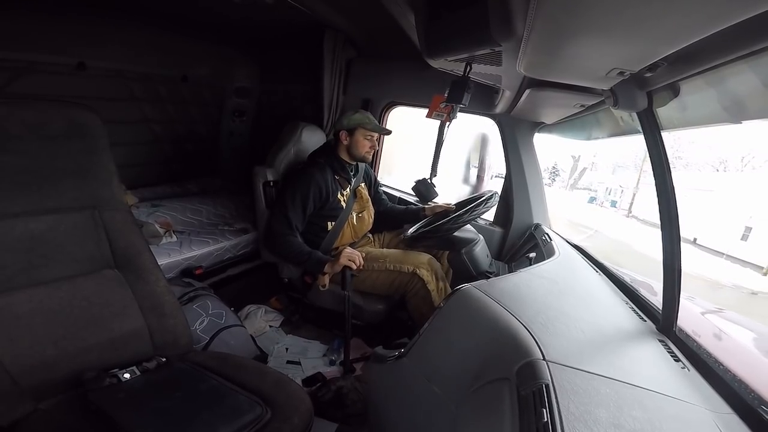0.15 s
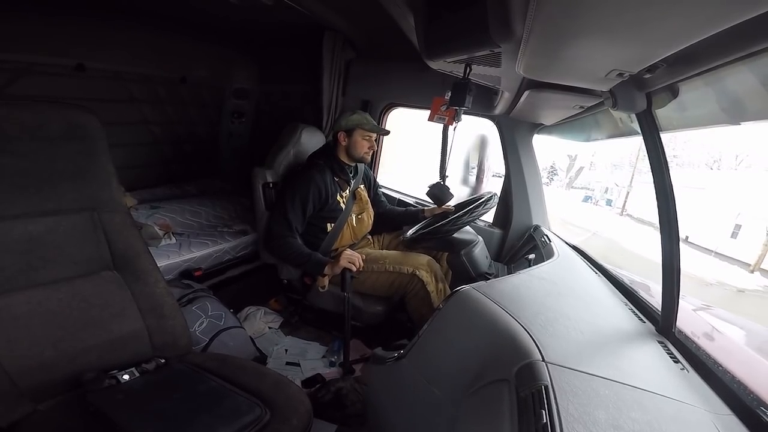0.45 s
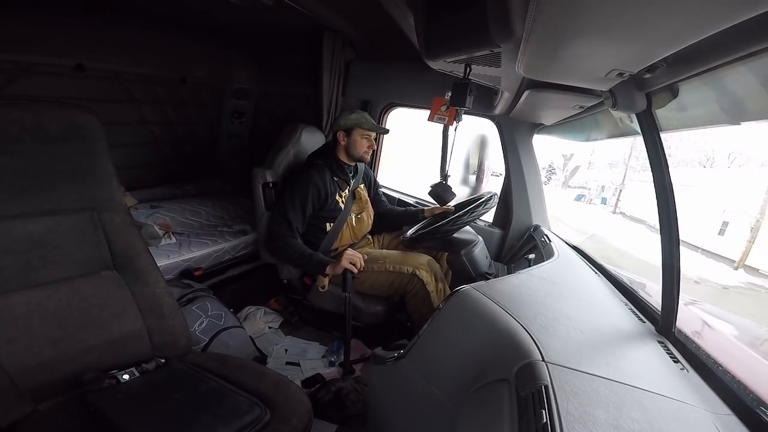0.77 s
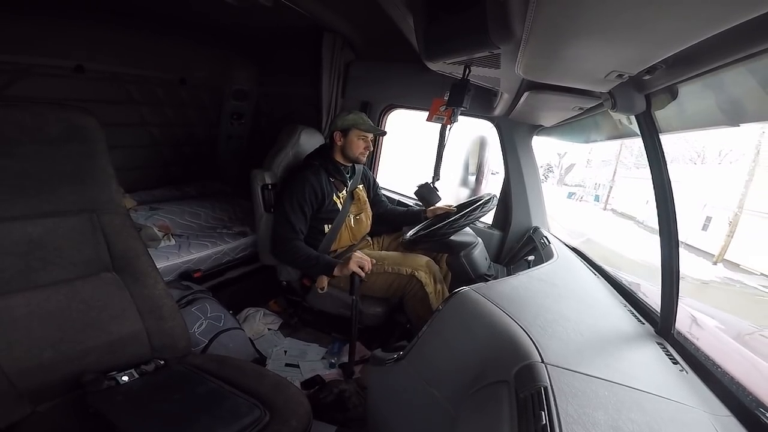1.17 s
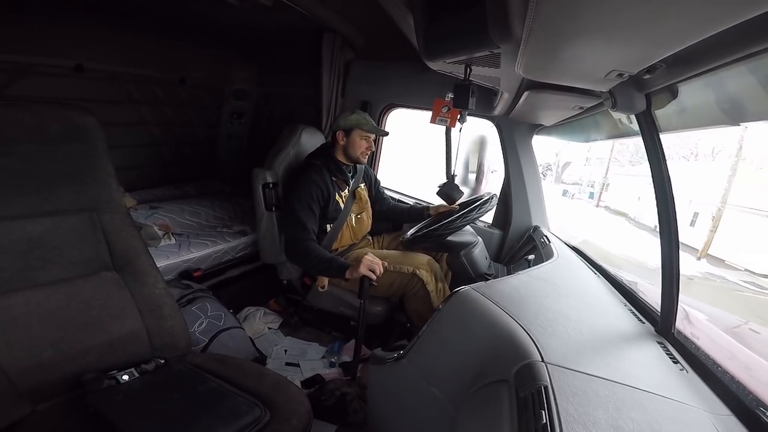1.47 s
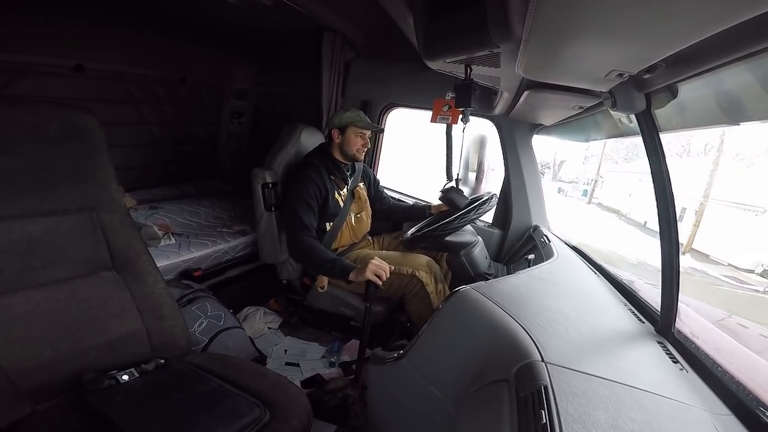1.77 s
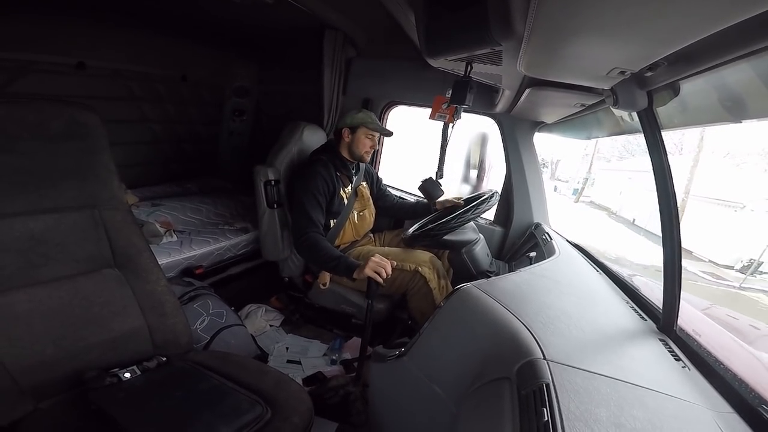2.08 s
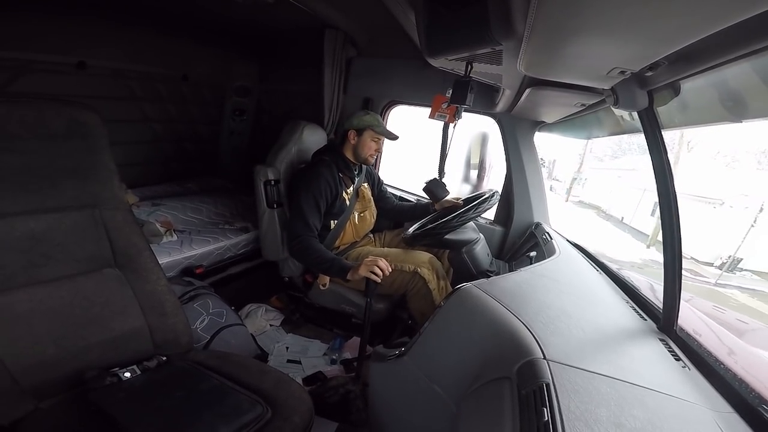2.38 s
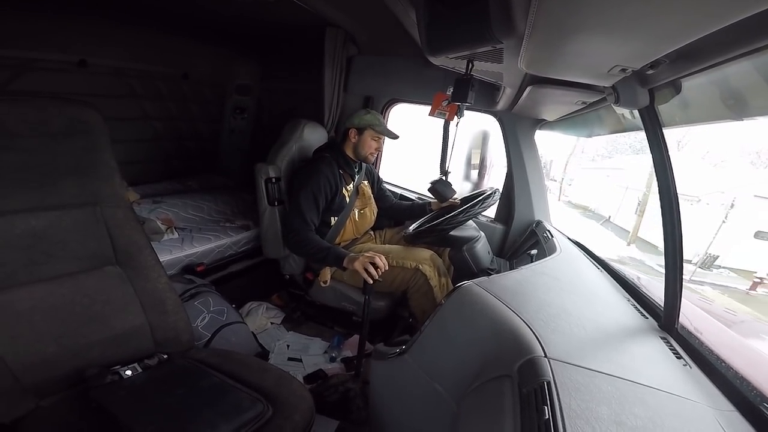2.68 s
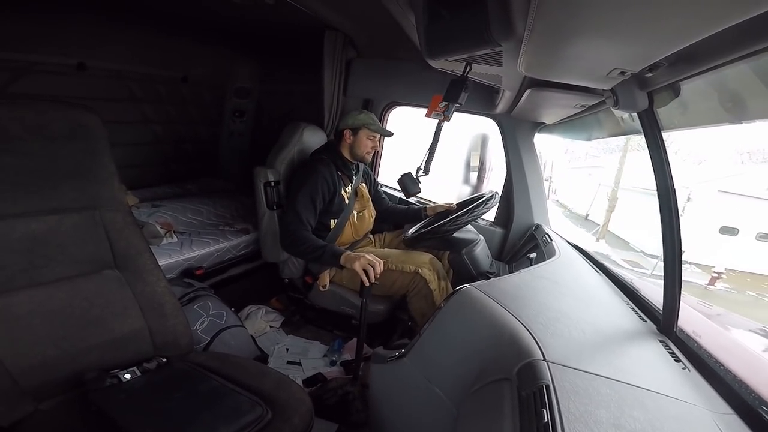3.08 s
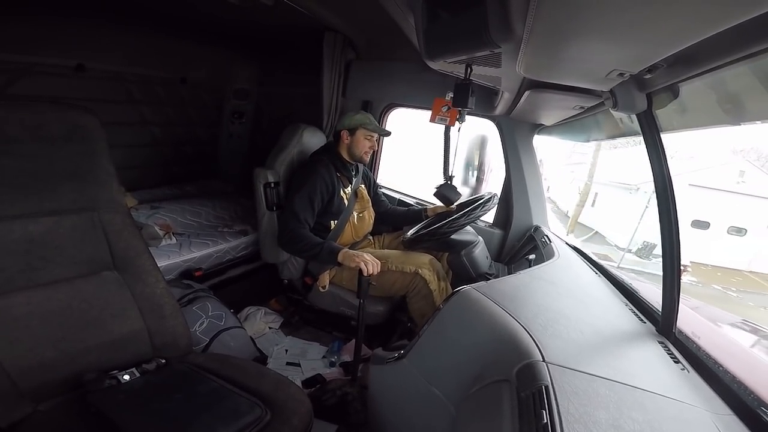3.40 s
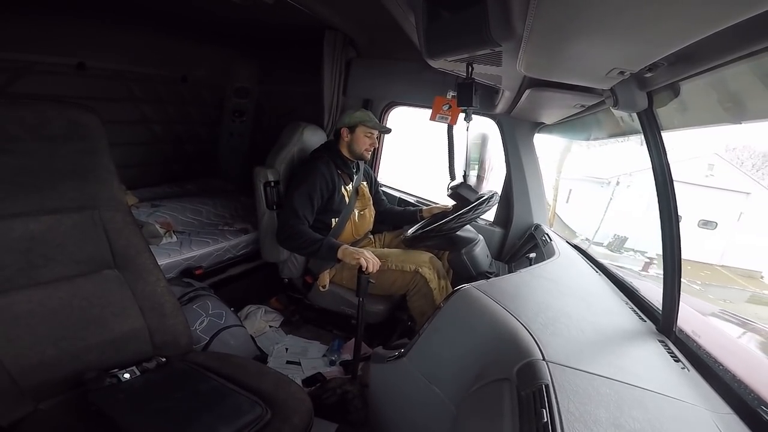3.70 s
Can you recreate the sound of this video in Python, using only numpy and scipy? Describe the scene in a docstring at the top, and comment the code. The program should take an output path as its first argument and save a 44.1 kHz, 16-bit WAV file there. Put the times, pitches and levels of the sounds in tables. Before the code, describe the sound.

Deep six-cylinder diesel engine growls in a truck cab, its revs rising and falling repeatedly.

```python
"""A six-cylinder diesel heard in a truck cab, revving up and easing off in turn, about 1200 to 1900 rpm.
Crank-locked sines boom; pulsed, filtered noise roars, clatters and hisses; gears whine in step with the crank.
A turbo whistles faintly. Trim squeaks as short rasping notes and buzzes in a narrow noise band.
Filtered noise rumbles as the road. Side noise fades, narrowing the stereo to mono in the first 1.5 s."""
import sys
import numpy as np
from scipy import signal
from scipy.fft import rfft, irfft
from scipy.io import wavfile
from scipy.ndimage import uniform_filter1d, minimum_filter1d

SR = 44100
rng = np.random.default_rng(int(sys.argv[2]) if len(sys.argv) > 2 else 0)


def wrap_up_sound(samples):
    """Save the sound to the file named by the first command line argument, as 16-bit audio."""
    columns = np.atleast_2d(samples).T
    # keep every value between -1 and 1, then stretch to whole-number steps
    tamed = np.clip(columns, -1, 1)
    steps = np.round(tamed * 32767).astype(np.int16)
    wavfile.write(sys.argv[1], SR, steps)


N = 169785
T = np.arange(N) / SR

# engine speed before wander: t/s, speed/rpm
SPEED_RPM = [(0.0, 1186), (0.2, 1265), (0.4, 1388), (0.75, 1670), (0.87, 1699), (1.1, 1533), (1.5, 1323),
             (1.7, 1222), (1.85, 1178), (2.15, 1323), (2.45, 1590), (2.6, 1655), (2.75, 1605), (2.92, 1525),
             (3.05, 1569), (3.4, 1807), (3.6, 1916), (3.85, 1749)]
SPEED_WANDER, SPEED_WANDER_HZ = 0.002, 8.25  # rms share, rate
# main engine orders, relative: t/s, crank shake/dB, firing note/dB, lope just above it/dB, its fifth/dB, its octave/dB
MAIN_ORDERS = [(0.0, -36, -28, -35, -17, -36), (0.3, -38, -14, -35, -24, -14),
               (0.5, -26, -28, -30, -16, -16), (0.75, -21, -29, -20, -23, -28),
               (0.9, -38, -36, -25, -21, -26), (1.2, -26, -17, -20, -23, -23),
               (1.5, -21, -31, -33, -14, -28), (1.7, -26, -34, -36, -26, -26),
               (1.95, -38, -26, -30, -23, -24), (2.2, -32, -17, -30, -18, -15),
               (2.5, -19, -24, -20, -24, -16), (2.85, -32, -27, -16, -20, -14),
               (3.15, -23, -38, -23, -29, -20), (3.35, -35, -19, -24, -16, -30),
               (3.55, -28, -13, -21, -27, -35), (3.85, -24, -19, -27, -18, -42)]
# those orders: multiples of crank speed
MAIN_MULTIPLES = (1, 3, 3.5, 4.5, 6)
MAIN_DB, TWELFTH_DB = 2, -10.5  # gain of all main orders; twelfth above the firing note re its octave
# other orders, from unequal cylinders, relative: multiple of crank speed, level/dB
ORDER_LEVELS = [(2, -24), (2.5, -27), (4, -28.5), (5, -31), (5.5, -32), (7, -33), (7.5, -30), (10, -36),
                (10.5, -34.5), (12, -41), (15, -38)]
# cab response to those orders: f/Hz, gain/dB
CAB = [(41, -23), (50, -5), (63, 0), (160, 3.5), (185, -5.5), (230, -2.5), (265, -9.5), (400, -14)]
UPPER_FOLLOW, LOWER_FOLLOW = 0.93, 0.52  # order level against load, dB per dB
MAIN_FLUTTER, FLUTTER, FLUTTER_HZ = 0.12, 0.7, 6.45  # rms shares, rate
# engine load as relative roar level: t/s, level/dB
LOAD = [(0, -25.5), (.1, -28), (.27, -26.5), (.45, -33.5), (.6, -37.5), (1.1, -40), (1.7, -39.5),
        (1.92, -31), (2.15, -29.5), (2.5, -31), (2.95, -34), (3.15, -35.5), (3.45, -32.5), (3.85, -37.5)]
# exhaust roar spectrum, relative: f/Hz, level/dB per Hz
ROAR = [(120, -30.5), (240, 5.5), (330, 2), (510, -3), (600, -5), (750, -2.5), (1000, -9.5), (1300, -12.5),
        (1550, -14), (1900, -14.5), (2400, -29), (3000, -30.5), (6000, -69)]
# valve clatter spectrum, relative: f/Hz, level/dB per Hz
CLATTER = [(700, -24.5), (1500, -2), (2300, 7.5), (2800, -2.5), (3500, -1.5), (3900, 1.5), (4300, -3),
           (5400, -10), (7000, -38.5)]
# air hiss spectrum, relative: f/Hz, level/dB per Hz
HISS = [(3500, -21.5), (5300, -1.5), (6600, 0.5), (7200, -10.5), (9000, -11), (11500, -20), (12700, -19),
        (15000, -40.5)]
ROAR_DB, CLATTER_DB, HISS_DB = 2.5, 2.5, -7
# common level of clatter and hiss, relative: t/s, level/dB
TREBLE_LEVEL = [(0, -50), (.28, -51), (.5, -58), (.8, -54), (1.65, -53.5), (1.9, -51.5), (2.15, -47),
                (2.9, -49.5), (3.1, -52), (3.5, -49), (3.85, -51)]
PULSE_DEPTH, CLATTER_DEPTH = 0.31, 0.21  # pulsed share of the noise amplitude
PULSE_DECAY_FIRINGS, UNEVEN_DB = 0.45, 1.5
REPEAT_SHARE = 0.42  # share of roar drive power repeating every two turns
# cab panels rung by the roar, relative: f/Hz, half-width at -6 dB/Hz, level/dB
PANELS = [(311, 49, -9.5), (600, 20, -14), (658.4, 26, -14.5), (751, 26, -22.5), (900, 68, -20.5),
          (989, 66, -20.5)]
# extra engine-noise colour while the stereo is wide: f/Hz, gain/dB
WIDE_COLOUR = [(305, 2.5), (370, -5), (450, -3.5), (660, -7), (760, 5.5), (900, 2), (1100, -2.5), (1280, 4),
               (1520, 1.5), (1700, 9), (1870, -5), (2100, -1.5), (3900, 5.5), (4600, 1.5), (6400, 8.5),
               (7300, 14.5), (9700, 4.5)]
WIDE_UNTIL_S, PLAIN_FROM_S = 0.3, 0.73
# gear meshes, lower and upper: teeth passing per crank turn
TEETH = (83, 105)
# lower gear whine: t/s, level/dB
LOWER_WHINE = [(0, -38), (.2, -37), (.33, -35), (.42, -49), (.65, -62), (.78, -49), (.86, -52), (.94, -46),
               (1.02, -62), (1.11, -49), (1.16, -56), (1.21, -45.5), (1.255, -45), (1.272, -57),
               (1.29, -43.5), (1.4, -63), (1.43, -48), (1.47, -46), (1.52, -58), (2.24, -54), (2.275, -35),
               (2.31, -56), (3.1, -57), (3.25, -51), (3.6, -59), (3.85, -52)]
# upper gear whine: t/s, level/dB
UPPER_WHINE = [(.65, -72), (.7, -57), (.93, -58), (.955, -66), (.98, -52), (1.09, -72), (3, -66),
               (3.4, -58), (3.85, -68)]
# turbo whistle, falling in pitch: t/s, f/Hz, level/dB
TURBO = [(.7, 6700, -88), (1.08, 6020, -70), (1.35, 5620, -76), (1.6, 5400, -70), (2.1, 5150, -84)]
WHINE_WIDTH_HZ, WHINE_STEADY = 32, 1.9  # blur; steady part re blurred part
# trim squeaks: start/s, length/s, f/Hz, note/dB, overtones/dB
SQUEAKS = [(0.486, 0.014, 2550, -54, -64), (1.306, 0.03, 2340, -42.5, -49), (1.342, .024, 2330, -45, -58),
           (2.318, 0.02, 2330, -51, -50), (3.488, .06, 2340, -47.5, -55)]
SQUEAK_BLUR_HZ, SQUEAK_THIRD_DB = 230, -10  # third harmonic re second
# buzzing trim: t/s, level/dB
SIZZLE_LEVEL = [(2.2, -80), (2.45, -58), (2.63, -58), (2.67, -51.5), (2.71, -58), (2.9, -57), (2.96, -51.5),
                (3.05, -75)]
SIZZLE_HZ, SIZZLE_WIDTH_HZ, SIZZLE_SHAKE = 3990, 220, 0.3
# road rumble spectrum, relative: f/Hz, level/dB per Hz
RUMBLE = [(12, -21), (27, -10.5), (42, -13), (62, -1), (90, -3.5), (140, -2.5), (180, -5.5), (250, -15),
          (310, -21.5), (380, -22.5), (480, -37.5), (1000, -79.5)]
# road rumble: t/s, level/dB
RUMBLE_LEVEL = [(0, -13.5), (.5, -25.5), (.9, -21), (1.12, -19), (1.4, -19), (1.75, -17), (2.1, -22),
                (2.7, -18), (3.1, -24), (3.85, -18)]
# diffuse side spectrum, relative: f/Hz, level/dB per Hz
SIDE_SHAPE = [(40, -10), (64, -3.5), (138, 1), (189, -9), (264, -18), (304, -2.5), (479, -23.5), (890, -4),
              (1080, -17.5), (1270, -13.5), (1540, -22), (1820, -23.5), (2610, -44.5), (4730, -49.5),
              (6770, -39.5), (9680, -62.5), (15000, -95)]
# stereo width as relative side level: t/s, level/dB
WIDTH = [(0, 2.5), (.35, 5.5), (.6, 1.5), (.9, -7.5), (1.25, -21.5), (1.5, -69)]
SIDE_DB = -19.5
EDGE_HZ = 15100  # band limit


def amp(db):
    """Decibels to gain."""
    return 10 ** (np.asarray(db) / 20)


def unit(x):
    """Scales to rms 1."""
    return x / np.sqrt(np.mean(abs(x) ** 2) + 1e-20)


def curve(table, axis=1):
    """One column of a time table at every sample."""
    columns = np.transpose(table)
    return np.interp(T, columns[0], columns[axis])


def read(points, hz):
    """A spectrum table on a log-frequency axis."""
    f, db = np.transpose(points)
    return np.interp(np.log(hz + 1), np.log(f + 1), db)


def colour(x, points):
    """Filters by a spectrum table, 12 dB/octave skirts beyond its ends; rms 1."""
    hz = np.fft.rfftfreq(N, 1 / SR)
    low_skirt = np.minimum(hz / points[0][0], 1) ** 2
    high_skirt = 1 / np.maximum(hz / points[-1][0], 1) ** 2
    return unit(irfft(rfft(x) * amp(read(points, hz)) * low_skirt * high_skirt, N))


def drift(hz):
    """Complex noise with a Gaussian spectrum about zero frequency; rms 1."""
    f = np.fft.fftfreq(N, 1 / SR)
    lowpass = np.exp(-(f / hz) ** 2)
    # independent weights break the +f/-f symmetry: the result is complex
    lopsided = 1 + np.sign(f) * np.exp(2j * np.pi * rng.random(N))
    return unit(np.fft.ifft(np.fft.fft(rng.standard_normal(N)) * lowpass * lopsided))


def order_wave(order, turns, flutter):
    """Sine locked to the crank, fluttering in level and phase."""
    tone = np.exp(2j * np.pi * (order * turns + rng.random()))
    return (tone * (1 + flutter * drift(FLUTTER_HZ))).real


def boom(crank_hz, turns):
    """Low engine orders fill the cab; of the unequal-cylinder orders, the upper follow load most."""
    out = np.zeros(N)
    main = [(order, curve(MAIN_ORDERS, axis=column + 1)) for column, order in enumerate(MAIN_MULTIPLES)]
    main.append((9, main[-1][1] + TWELFTH_DB))  # twelfth swells with the octave
    for order, db in main:
        out += amp(MAIN_DB + db) * order_wave(order, turns, MAIN_FLUTTER)
    load_db = curve(LOAD) - curve(LOAD).mean()
    for order, db in ORDER_LEVELS:
        follow = UPPER_FOLLOW if order > MAIN_MULTIPLES[-1] else LOWER_FOLLOW
        level_db = db + read(CAB, order * crank_hz) + follow * load_db
        out += amp(level_db) * order_wave(order, turns, FLUTTER)
    return np.sqrt(2) * out


def engine_noise(turns):
    """Exhaust roar, valve clatter and air hiss pulse with firing; part of the roar repeats every two turns."""
    pattern = rng.standard_normal(size=1024)
    repeating = np.interp(turns / 2 % 1, np.linspace(0, 1, len(pattern)), pattern)
    repeating = np.sqrt(REPEAT_SHARE) * colour(repeating, ROAR)
    pulsing = np.sqrt(1 - REPEAT_SHARE) * colour(puffs(turns, PULSE_DEPTH), ROAR)
    drive = repeating + pulsing
    roar = amp(curve(LOAD)) * (amp(ROAR_DB) * drive + panels(drive))
    clatter = amp(CLATTER_DB) * colour(puffs(turns, CLATTER_DEPTH), CLATTER)
    hiss = amp(HISS_DB) * colour(puffs(turns, CLATTER_DEPTH), HISS)
    return roar + amp(curve(TREBLE_LEVEL)) * (clatter + hiss)


def puffs(turns, depth):
    """Noise surging at three firings per turn, uneven by cylinder and by firing."""
    firing = 3 * turns
    index = firing.astype(int)
    by_cylinder = rng.standard_normal(size=6)[index % 6]
    by_firing = rng.standard_normal(size=1000)[index]
    size = amp(UNEVEN_DB * (by_cylinder + by_firing) / np.sqrt(2))
    pulse = unit(size * np.exp(-(firing % 1) / PULSE_DECAY_FIRINGS))
    return rng.standard_normal(N) * (1 - depth + depth * pulse)


def panels(drive):
    """Cab panels ring as narrow resonances driven by the roar."""
    hz, spectrum = np.fft.rfftfreq(N, 1 / SR), rfft(drive)
    out = np.zeros(N)
    for f, half_width_hz, db in PANELS:
        resonance = 1 / (1 + 1j * (hz - f) / half_width_hz) ** 2
        out += amp(db) * unit(irfft(spectrum * resonance, N))
    return out


def wide_colour(x):
    """Extra filter colour, crossfaded out as the stereo narrows."""
    coloured = irfft(rfft(x) * amp(read(WIDE_COLOUR, np.fft.rfftfreq(N, 1 / SR))), N)
    return x + np.interp(T, [WIDE_UNTIL_S, PLAIN_FROM_S], [1, 0]) * (coloured - x)


def whines(turns):
    """Two gear meshes sing at tooth rate; the turbo whistles on its own falling pitch."""
    turbo_cycles = np.cumsum(curve(TURBO)) / SR
    lines = [(TEETH[0] * turns, curve(LOWER_WHINE)), (TEETH[1] * turns, curve(UPPER_WHINE)),
             (turbo_cycles, curve(TURBO, axis=2))]
    out = np.zeros(N)
    for cycles, db in lines:
        tone = np.exp(2j * np.pi * cycles) * (WHINE_STEADY + drift(WHINE_WIDTH_HZ))
        out += amp(db) * unit(tone.real)
    return out


def squeaks():
    """Rubbing trim chirps: a steady-pitched note under blurred, raspy second and third harmonics."""
    out = np.zeros(N)
    for start_s, length_s, hz, note_db, rasp_db in SQUEAKS:
        swell = np.sqrt(abs(np.sin(np.pi * np.clip((T - start_s) / length_s, 0, 1))))
        note = np.exp(2j * np.pi * hz * T)
        second = drift(SQUEAK_BLUR_HZ) * note ** 2
        third = amp(SQUEAK_THIRD_DB) * drift(SQUEAK_BLUR_HZ) * note ** 3
        out += np.sqrt(2) * swell * (amp(note_db) * note + amp(rasp_db) * (second + third)).real
    return out


def sizzle(turns):
    """Loose trim buzzes in a narrow treble band, shaken once per crank turn."""
    band = unit((np.exp(2j * np.pi * SIZZLE_HZ * T) * drift(SIZZLE_WIDTH_HZ)).real)
    return amp(curve(SIZZLE_LEVEL)) * band * unit(1 + SIZZLE_SHAKE * np.cos(2 * np.pi * turns))


def road():
    """Road rumble: low filtered noise of varying level."""
    return amp(curve(RUMBLE_LEVEL)) * colour(rng.standard_normal(N), RUMBLE)


def cab_sides(turns):
    """Diffuse cab sound: pulsed noise following load, faded by the width curve."""
    load_db = curve(LOAD) - curve(LOAD).max()
    return amp(SIDE_DB + load_db + curve(WIDTH)) * colour(puffs(turns, PULSE_DEPTH), SIDE_SHAPE)


def scene():
    """Engine, trim and road in the middle; diffuse cab sound in opposite phase left and right."""
    crank_hz = curve(SPEED_RPM) / 60
    crank_hz = crank_hz * (1 + SPEED_WANDER * drift(SPEED_WANDER_HZ).real)
    turns = np.cumsum(crank_hz) / SR
    engine = boom(crank_hz, turns) + wide_colour(engine_noise(turns)) + whines(turns)
    mid = engine + squeaks() + sizzle(turns) + road()
    side = cab_sides(turns)
    return np.array([mid + side, mid - side])


def record(dry):
    """Quick, soft limiter on the louder channel, 1 ms end fades, then the band limit."""
    ceiling_db, slope = -5, 0.65  # slope: share of the excess dB removed
    wanted = np.minimum(amp(ceiling_db) / (abs(dry).max(0) + 1e-9), 1) ** slope
    gain = uniform_filter1d(minimum_filter1d(wanted, size=900), size=700)  # samples
    gain *= np.minimum(np.minimum(T, T[::-1]) / 0.001, 1)
    lowpass = signal.firwin(511, EDGE_HZ, window=("kaiser", 9), fs=SR)
    return signal.oaconvolve(dry * gain, lowpass[None], "same")


dry = scene()
out = record(dry)
wrap_up_sound(out)
```